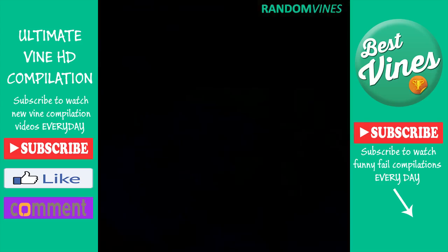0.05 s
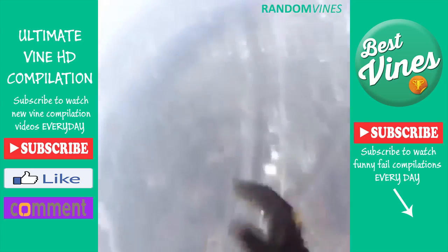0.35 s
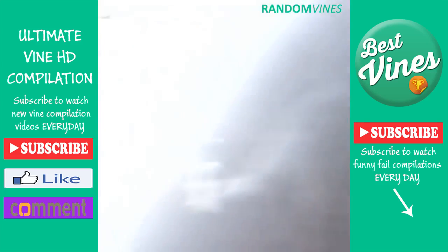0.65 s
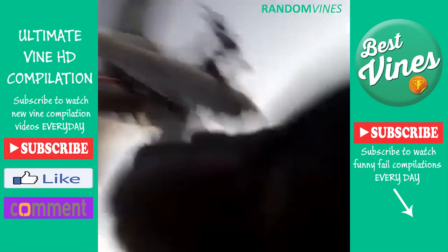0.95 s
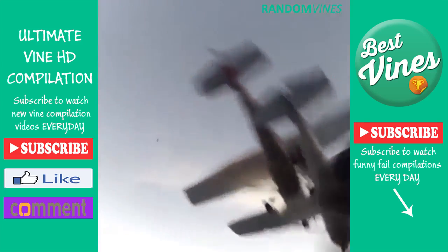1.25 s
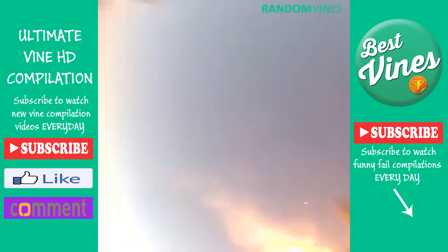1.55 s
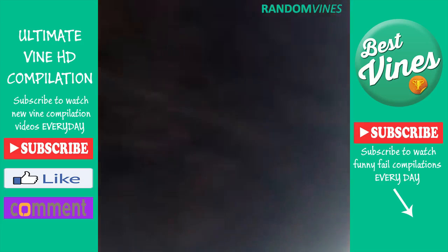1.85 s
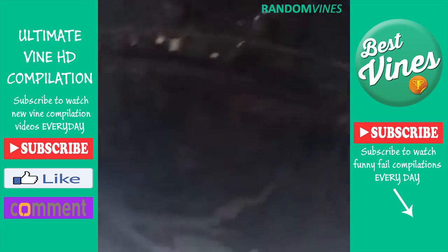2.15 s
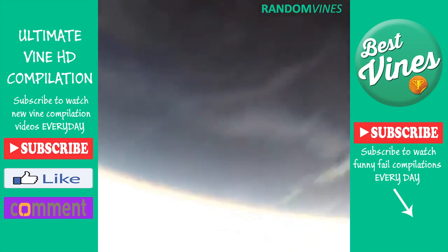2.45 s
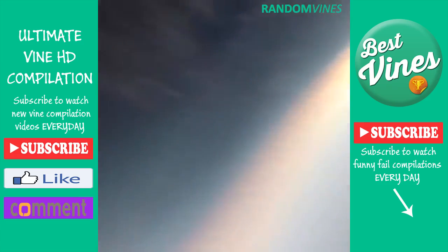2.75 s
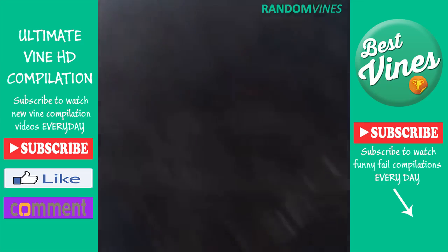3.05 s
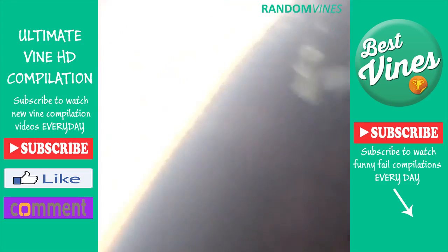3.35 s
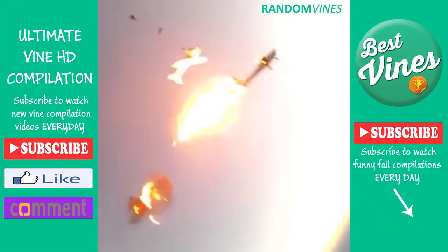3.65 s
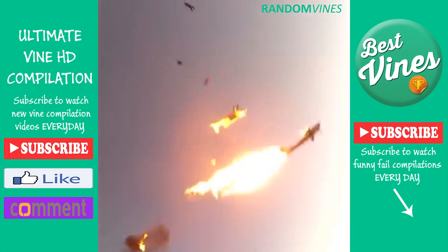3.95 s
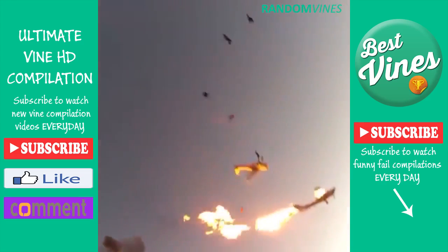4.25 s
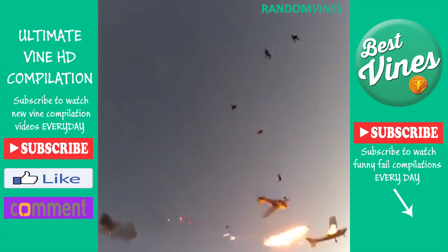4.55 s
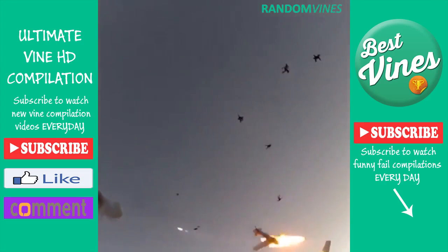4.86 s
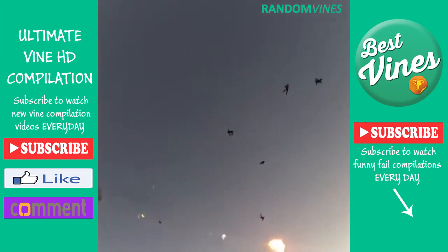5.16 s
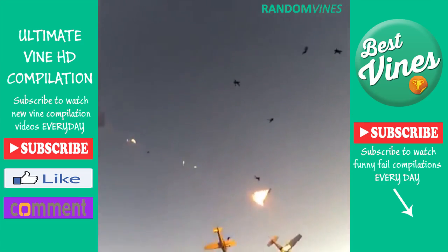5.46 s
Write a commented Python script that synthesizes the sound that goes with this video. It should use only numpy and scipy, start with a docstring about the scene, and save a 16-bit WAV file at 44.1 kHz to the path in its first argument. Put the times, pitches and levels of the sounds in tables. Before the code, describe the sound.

Wind roars and buffets the microphone in a fall through open air, with hollow knocks, gusting hiss and propeller planes droning past.

```python
"""Wind batters a small camera in a tight housing as it falls through open air among propeller planes.
Eddies buffet the microphone, flaps of air knock the housing into a hollow ring, and the airstream
hisses up whenever the housing turns into it. Something scrapes briefly on the shell.
Propeller blades send out trains of pressure pulses: one throbs close by in the first two seconds,
and later another drones from farther off."""
import sys
import numpy as np
from scipy import signal
from scipy.fft import rfft, irfft, next_fast_len
from scipy.io import wavfile
from scipy.ndimage import uniform_filter1d

SR = 44100
rng = np.random.default_rng(int(sys.argv[2]) if len(sys.argv) > 2 else 0)


def int16_out(signal):
    """Quantize to a 16-bit WAV file."""
    q = np.round(np.clip(np.atleast_2d(signal).T, -1, 1) * 32767)
    wavfile.write(sys.argv[1], SR, q.astype(np.int16))


N = 246519
TIME = np.arange(N) / SR
USUAL_FORCE_DB, USUAL_HISS_DB = -22, -28

# scrapes on the housing: (time [s], level [dB], half length [s])
SCRAPE_STROKES = [(0.546, -35, .028), (.648, -32, .008)]
# resonances they excite: (frequency [Hz], relative level [dB])
SCRAPE_SPECTRUM = [(1600, -20), (2110, -2), (2450, -4), (2960, 3), (3300, -10), (4200, -27)]

# blade harmonics before the brightness tilt: (frequency [Hz], relative level [dB])
FAR_HARMONICS = [(85, -8), (170, -16), (255, -18), (340, 4.5), (425, -2.5), (510, -2.5), (595, -4.5),
                 (680, -10), (765, -17), (850, -22), (1020, -61)]
NEAR_HARMONICS = [(78, 0.5), (156, 3), (234, -2), (312, -2.5), (390, -9.5), (470, -12.5), (620, -21),
                  (950, -43)]
# swells of the close propeller: (time [s], level [dB], brightness [dB/octave])
NEAR_SWELLS = [(.22, -14, -15), (.33, -27, -9), (.41, -16.5, -5.5), (.5, -14, -7), (.575, -13.5, -3),
               (.62, -16, 1), (.69, -19.5, 5), (.8, -26.5, 2), (1.12, -23, 0), (1.33, -18.5, 1.5),
               (1.42, -15.5, 0.5), (1.54, -13, -1.5), (1.66, -14.5, 1.5), (1.78, -11.5, 2.5),
               (1.88, -17.5, -4), (1.97, -33, -22), (2.2, -15.5, 15)]
# its speed: (time [s], blade rate [Hz])
NEAR_BLADE_RATE = [(.3, 78), (.42, 79.5), (.55, 79), (.65, 78.3), (1.5, 78.4), (1.7, 78.2), (2.2, 78.2)]
# hiss of its blade tips: (frequency [Hz], relative level [dB])
TIP_SPECTRUM = [(3500, -20), (4500, 3.5), (5300, -1), (6000, -22), (7200, 2), (8500, -8), (11000, -42.5)]

# flaps of air: (time [s], knock [dB], crackle [dB], decay [s], clack [dB], clack pitch [Hz])
FLAP_HITS = [(0.034, -16, -21.5, 0.0061, -26, 2960), (.057, -1.5, -27, 0.0093, -21, 1810),
             (0.082, -4, -26, .003, -35, 2150), (.1029, 0, -26, 0.0087, -25, 1380),
             (.129, -23, -24.5, .013, -18.5, 2190), (0.155, -20, -27, 0.021, -21, 2940),
             (.1808, -4, -28, 0.016, -24, 2180), (0.185, -20, -35, .006, -28, 4400),
             (.213, -26, -26, .012, -26, 2960), (.219, -17, -30, .009, -24, 2025),
             (.247, -17, -29, 0.026, -31, 1970), (.285, -4, -29.5, 0.014, -33, 2160),
             (.312, -26, -38, 0.006, -27, 2200), (0.485, -7, -31, .006, -31, 1090),
             (.671, -4, -28, 0.0062, -18, 1830), (2.223, -8, -44, 0.013, -34, 1110),
             (2.839, -16, -31, .012, -35, 4700), (2.862, -3, -31, 0.0056, -34, 2240)]
# ring of the housing: (nominal pitch [Hz], level [dB], decay [share of the flap's])
HOUSING_MODES = [(192, -6, 0.37), (380, -24, 1), (544, -1.5, 0.41), (643, -10, 0.48), (2960, -30, 0.86)]
# crackle on each flap: (frequency [Hz], relative level [dB])
CRACKLE_SPECTRUM = [(400, 2), (1200, 4.5), (1600, -5), (1950, 7), (2500, -1), (3000, 5.5), (3500, -5),
                    (4500, 0), (6200, -8), (8800, -4.5), (12000, -9), (16000, -15)]

# sweep of the hollow rush: (time [s], centre [Hz], level [dB])
RUSH_SWEEP = [(.57, 1200, -58), (.615, 1250, -33), (.72, 1400, -35), (.76, 1600, -30.5), (.88, 1750, -24),
              (.98, 3300, -26), (1.18, 3160, -25), (1.42, 3100, -47), (1.75, 3300, -41),
              (1.87, 3550, -15.5), (1.97, 3400, -37), (2.02, 1570, -28), (2.1, 1300, -48), (2.5, 1040, -31),
              (2.68, 1000, -53), (2.95, 1160, -36), (3.15, 1270, -29), (3.31, 1590, -25),
              (3.45, 3130, -21.5), (3.55, 3430, -42), (4.8, 1800, -55), (5.05, 1450, -38),
              (5.24, 1420, -36), (5.385, 1600, -29), (5.45, 1400, -35), (5.58, 1300, -39)]
# airstream past the edges as the housing tumbles: (time [s], hiss [dB])
HISS_ENVELOPE = [(0, -30), (.15, -31.5), (.3, -34.5), (.345, -41.5), (.58, -36.5), (.72, -31.5),
                 (.742, -22), (.86, -27.5), (.95, -21.5), (1.03, -24.5), (1.17, -24), (1.35, -27.5),
                 (1.55, -31), (1.6, -36), (1.79, -35), (1.865, -22.5), (1.95, -22), (1.975, -24.5),
                 (2.005, -26), (2.06, -34.5), (2.12, -27.5), (2.26, -31.5), (2.5, -32), (2.66, -42),
                 (2.86, -33.5), (2.995, -37), (3.03, -26.5), (3.19, -28.5), (3.28, -24.5), (3.45, -26),
                 (3.495, -31), (3.78, -30.5), (3.84, -33.5), (3.91, -29.5), (4.3, -26), (4.5, -26),
                 (4.62, -28), (4.7, -24), (4.82, -27), (5.05, -24), (5.24, -24.5), (5.39, -23), (5.44, -25),
                 (5.58, -26.5)]
# colours of the airstream's layers: (frequency [Hz], relative level [dB])
RUSH_DRIVE_SPECTRUM = [(400, 5), (900, 18.5), (4000, 3), (5500, -27)]
HISS_SPECTRUM = [(450, -4.5), (800, 1), (1050, 1), (1400, -0.5), (1800, 0.5), (2800, 0), (3300, -6),
                 (3950, -8), (4450, -13), (6000, -28.5), (7200, -17.5), (8400, -10.5), (10000, -11.5),
                 (16000, -65)]
FIZZ_SPECTRUM = [(2000, -14), (3000, -15), (4700, 3), (5900, -19.5), (7200, -33), (10300, -10.5),
                 (13400, -2.5), (15000, 4)]
SIZZLE_SPECTRUM = [(3800, -20), (4500, -1.5), (5300, 25.5), (6000, -24), (10300, 17), (11350, 30.5),
                   (12650, 30.5), (13400, -20), (14600, -20), (16000, -23)]

# push of the wind on the housing: (time [s], force [dB])
WIND_FORCE = [(0, -26), (.1, -24), (.33, -28.5), (.56, -20.5), (.65, -19), (.75, -21), (.86, -20),
              (1.04, -27.5), (1.33, -22.5), (1.55, -29.5), (1.78, -29), (1.85, -19.5), (2.01, -18),
              (2.16, -20), (2.25, -18), (2.45, -19.5), (2.64, -21.5), (2.8, -21), (2.97, -17),
              (3.05, -19.5), (3.35, -20), (3.42, -28), (3.55, -27), (3.88, -24), (4, -22), (4.45, -22.5),
              (4.62, -23), (5.25, -21.5), (5.58, -21)]
# single big eddies that thump the microphone: (time [s], rumble [dB], buffet [dB], half length [s])
EDDY_THUMPS = [(0.04, -21.5, -17, 0.077), (0.233, -16, -18, 0.034), (0.62, -11, -22, 0.019),
               (0.685, -16, -31, 0.029), (1.65, -30, -18, .02), (2.155, -18, -17, 0.029),
               (2.365, -11.5, -33, 0.026), (2.53, -14, -32, 0.021), (2.717, -17, -30, 0.012),
               (2.847, -19, -13, .014), (2.917, -22, -17, .025), (2.972, -16, -32, 0.031),
               (3.184, -21, -35, 0.012), (3.487, -14.5, -28, 0.04), (3.544, -27, -19, 0.019),
               (4.275, -20, -37, 0.078), (4.48, -17, -28, 0.043)]
# dips in the buffeting: (middle [s], half length [s], depth [dB])
BUFFET_CALMS = [(3.53, 0.48, -11), (5.0, 0.27, -5.5)]
# colours of large, middling and small eddies: (frequency [Hz], relative level [dB])
BUFFET_SPECTRUM = [(12, -10), (25, -9), (42, 7.5), (75, 4), (115, 10.5), (150, 10.5), (260, 0.5)]
RUMBLE_SPECTRUM = [(70, -6), (115, -6), (145, -1), (260, 3), (400, -2.5), (480, -9.5), (800, -14)]
ROAR_SPECTRUM = [(250, -26), (390, 2.5), (460, 2.5), (630, 1.5), (760, -6.5), (920, -11.5), (1250, -25.5),
                 (1700, -58), (2800, -50)]


def gain_of(db):
    """Decibels to amplitude."""
    return 10 ** (np.asarray(db) / 20)


def unit_rms(x):
    """Scales to rms 1."""
    return x / np.sqrt(np.mean(x ** 2) + 1e-20)


def level_at(spectrum, hz):
    """A spectrum's dB at hz, on a log-frequency axis; -90 dB beyond its ends."""
    f, db = np.transpose(spectrum)
    return np.interp(np.log(hz + 1), np.log(f + 1), db, left=-90, right=-90)


def curves(rows):
    """One automation curve for each column after a table's time column."""
    times, *columns = np.transpose(rows)
    return [np.interp(TIME, times, column) for column in columns]


def swell(middle_s, half_length_s):
    """A bell-shaped envelope that peaks at 1."""
    return np.exp(-((TIME - middle_s) / half_length_s) ** 2)


def gate(start_s, rise_s, end_s, release_s):
    """Attack, hold and release, from 0 to 1."""
    return np.clip((TIME - start_s) / rise_s, 0, 1) * np.clip((end_s - TIME) / release_s, 0, 1)


def coloured(x, spectrum):
    """Equalises x with a spectrum, at rms 1."""
    size = next_fast_len(N + 4096)
    eq = gain_of(level_at(spectrum, np.fft.rfftfreq(size, 1 / SR)))
    return unit_rms(irfft(rfft(x, size) * eq, size)[:N])


def wander(rate_hz):
    """Smooth random modulation of rms 1, moving at up to about rate_hz."""
    size = next_fast_len(N)
    lowpass = np.exp(-(np.fft.rfftfreq(size, 1 / SR) / rate_hz) ** 2)
    return unit_rms(irfft(rfft(rng.standard_normal(size)) * lowpass, size)[:N])


def ticks(per_s):
    """Sparse impulses of random timing and size."""
    return (rng.random(N) < per_s / SR) * rng.standard_normal(N)


def turbulence(spectrum, span_s):
    """Coloured noise whose power, taken over span_s, is steady."""
    noise = coloured(rng.standard_normal(N), spectrum)
    width = int(span_s * SR)
    power = uniform_filter1d(uniform_filter1d(noise ** 2, width), width)
    return noise / np.sqrt(power + 1e-9)


def patchy(x, depth_db):
    """Small eddies colour the noise in patches some hundred Hz wide and some tens of ms long."""
    frames = signal.stft(x, nperseg=512, noverlap=384)[2]
    patches = uniform_filter1d(rng.standard_normal(frames.shape), size=5, axis=0)
    patches = unit_rms(uniform_filter1d(patches, size=12, axis=1))
    return signal.istft(frames * gain_of(depth_db * patches), nperseg=512, noverlap=384)[1][:N]


def resonate(x, centre_hz, width_hz):
    """A resonance that follows the curve centre_hz."""
    carrier = np.exp(2j * np.pi * np.cumsum(centre_hz) / SR)
    pole = np.exp(-np.pi * width_hz / SR)
    return 2 * (carrier * signal.lfilter([1 - pole], [1, -pole], x / carrier)).real


def scrapes():
    """Short runs of tiny slips ring the housing's bright resonances."""
    strokes = sum(gain_of(db) * swell(s, half_length) for s, db, half_length in SCRAPE_STROKES)
    return strokes * coloured(ticks(per_s=1500), SCRAPE_SPECTRUM)


def blade_pulses(rate_hz, tilt_db_per_octave, harmonics, jitter_cycles, scatter):
    """Each blade sends one pulse, a push then a pull; rough air shakes its timing and harmonics."""
    cycles = np.cumsum(rate_hz) / SR + jitter_cycles * wander(rate_hz=25)
    pulses, power = np.zeros(N), np.zeros(N)
    for k in range(1, 12):
        hz = np.clip(k * rate_hz.mean(), harmonics[0][0], harmonics[-1][0])
        height = gain_of(level_at(harmonics, hz) + tilt_db_per_octave * np.log2(k))
        waver = 1 + scatter * wander(rate_hz=15)
        pulses += height * waver * np.cos(2 * np.pi * k * cycles + np.pi / 3)
        power += height ** 2 / 2
    return pulses / np.sqrt(power)


def far_propeller():
    """A distant propeller comes in quickly, drones at a steady rate and recedes into the wind."""
    start_s, fade_db_per_s = 3.445, 3.5
    pulses = blade_pulses(rate_hz=np.full(N, 85.05), tilt_db_per_octave=14.5,
                          harmonics=FAR_HARMONICS, jitter_cycles=0.016, scatter=0.38)
    level_db = -21 - fade_db_per_s * (TIME - start_s)
    return pulses * gain_of(level_db) * gate(start_s, rise_s=0.24, end_s=5.6, release_s=0.21)


def near_propeller():
    """A close propeller throbs in swells; churned air buffets behind it and its blade tips hiss."""
    level_db, brightness = curves(NEAR_SWELLS)
    rate_hz = curves(NEAR_BLADE_RATE)[0]
    pulses = blade_pulses(rate_hz, brightness, NEAR_HARMONICS, jitter_cycles=0.005, scatter=0.12)
    throb_db = 0.6 * wander(rate_hz=28)
    wash = gain_of(-17) * turbulence(BUFFET_SPECTRUM, span_s=0.085)
    tip_db = -32.5 + 0.6 * np.minimum(brightness, 0)  # softer while the tone is dull
    tips = gain_of(tip_db) * coloured(rng.standard_normal(N), TIP_SPECTRUM) * (1 + 0.26 * pulses)
    fades = gate(NEAR_SWELLS[0][0], rise_s=0.048, end_s=NEAR_SWELLS[-1][0], release_s=0.013)
    return (pulses + wash + tips) * gain_of(level_db + throb_db) * fades


def flaps():
    """Each flap of air knocks the housing into a short hollow ring, topped by a clack and a crackle."""
    knock_rise_s, crackle_rise_s = 0.001, 0.0007
    clack_width_hz, clack_decay_s = 210, 0.0079
    age = TIME[:SR // 8]
    push, snap = 1 - np.exp(-age / knock_rise_s), 1 - np.exp(-age / crackle_rise_s)
    knock, crackle = np.zeros(N), np.zeros(N)
    for s, knock_db, crackle_db, decay, clack_db, clack_hz in FLAP_HITS:
        start = round(s * SR)
        during = slice(start, start + len(age))
        for hz, db, share in HOUSING_MODES:
            mode = np.sin(2 * np.pi * hz * rng.uniform(0.92, 1.037) * age)
            knock[during] += gain_of(knock_db + db) * push * mode * np.exp(-age / (decay * share))
        # the clack's pitch depends on where the flap lands; chatter roughens it
        chatter = np.cumsum(rng.standard_normal(len(age))) * np.sqrt(2 * np.pi * clack_width_hz / SR)
        clack = np.sin(2 * np.pi * clack_hz * age + uniform_filter1d(chatter, size=16))
        knock[during] += gain_of(clack_db) * push * clack * np.exp(-age / clack_decay_s)
        crackle[during] += gain_of(crackle_db) * snap * np.exp(-age / decay)
    return knock + crackle * turbulence(CRACKLE_SPECTRUM, span_s=0.018)


def hollow_rush():
    """Air across the housing's openings drives a broad resonance that sweeps as the housing turns."""
    centre_hz, level_db = curves(RUSH_SWEEP)
    rush = coloured(rng.standard_normal(N), RUSH_DRIVE_SPECTRUM)
    for _ in range(3):
        rush = resonate(rush, centre_hz, width_hz=1550)
    return unit_rms(rush) * gain_of(level_db)


def cavity_ring(hiss, facing_db, force_db):
    """A cavity lifts one band of the hiss: more when facing the air, less as the force chokes it."""
    centre_hz, width_hz = 3710, 320
    band = signal.lfilter(*signal.iirpeak(centre_hz, centre_hz / width_hz, fs=SR), hiss)
    lift_db = 4.5 + 0.12 * facing_db - 0.17 * force_db
    return hiss + band * (gain_of(lift_db) - 1)


def airstream(hiss_db, force_db, eddies):
    """Air tears past the housing's edges: a hiss that spits and flutters with the eddies."""
    flutter = unit_rms(gain_of(0.62 * wander(rate_hz=36) + 0.5 * eddies))
    spits = gain_of(-9.5) * unit_rms(ticks(per_s=350))
    grain = patchy(rng.standard_normal(N) + spits, depth_db=1.6)
    hiss = coloured(grain, HISS_SPECTRUM) * gain_of(hiss_db + 0.7)
    hiss = cavity_ring(hiss, hiss_db - USUAL_HISS_DB, force_db)
    rush = hollow_rush()
    fine_grain = patchy(rng.standard_normal(N), depth_db=1.5)
    fizz = coloured(fine_grain, FIZZ_SPECTRUM) * gain_of(0.94 * hiss_db - 17.5)
    # a thin high sizzle rides the wind's force and stays on when the hiss drops
    sizzle = coloured(rng.standard_normal(N), SIZZLE_SPECTRUM)
    sizzle *= gain_of(-42.5 + 0.54 * force_db + 1.9 * wander(rate_hz=21))
    lull_db = np.interp(TIME, [0.29, 0.34], [-3, 0])  # held back under the opening flaps
    return (hiss + rush + fizz + sizzle) * flutter * gain_of(lull_db)


def buffeting_wind(force_db, facing_db):
    """Large, middling and small eddies press on the microphone, each size gusting at its own speed."""
    calm_db = sum(db * swell(s, half_length) for s, half_length, db in BUFFET_CALMS)
    # buffet and rumble grow in the housing's lee, as it turns out of the airstream
    buffet = gain_of(-26.5 + 0.044 * force_db - 0.24 * facing_db + calm_db + 2.5 * wander(rate_hz=20))
    rumble = gain_of(-20.5 + 0.94 * force_db - 0.065 * facing_db + 1.9 * wander(rate_hz=7.8))
    roar = gain_of(-24.5 + force_db + 1.74 * wander(rate_hz=50))
    for s, rumble_db, buffet_db, half_length in EDDY_THUMPS:
        thump = swell(s, half_length)
        rumble = np.hypot(rumble, gain_of(rumble_db) * thump)
        buffet = np.hypot(buffet, gain_of(buffet_db) * thump)
    return (buffet * turbulence(BUFFET_SPECTRUM, span_s=0.13)
            + rumble * turbulence(RUMBLE_SPECTRUM, span_s=0.055)
            + roar * turbulence(ROAR_SPECTRUM, span_s=0.042))


def scene():
    """Wind, knocks, scrapes and two propellers reach one microphone, the same in both channels."""
    force_db = curves(WIND_FORCE)[0] - USUAL_FORCE_DB
    hiss_db = curves(HISS_ENVELOPE)[0]
    low_end = buffeting_wind(force_db, hiss_db - USUAL_HISS_DB) + near_propeller() + far_propeller()
    # the low end, levelled out, modulates the airstream
    eddies = low_end / np.sqrt(uniform_filter1d(low_end ** 2, size=4096) + 1e-9)
    mono = low_end + airstream(hiss_db, force_db, eddies) + flaps() + scrapes()
    return np.array([mono, mono])


def record(dry):
    """A soft clipper rounds the tallest peaks, then a steep low-pass trims the top."""
    ceiling, cutoff_hz = 0.74, 15250
    rounded = dry / (1 + (dry / ceiling) ** 6) ** (1 / 6)
    lowpass = signal.firwin(511, cutoff_hz, window=("kaiser", 9), fs=SR)
    return signal.oaconvolve(rounded, lowpass[None], "same")


dry = scene()
out = record(dry)
int16_out(out)
```